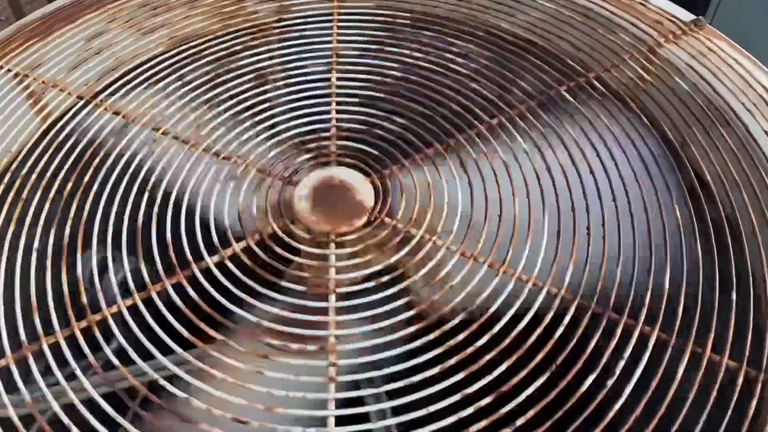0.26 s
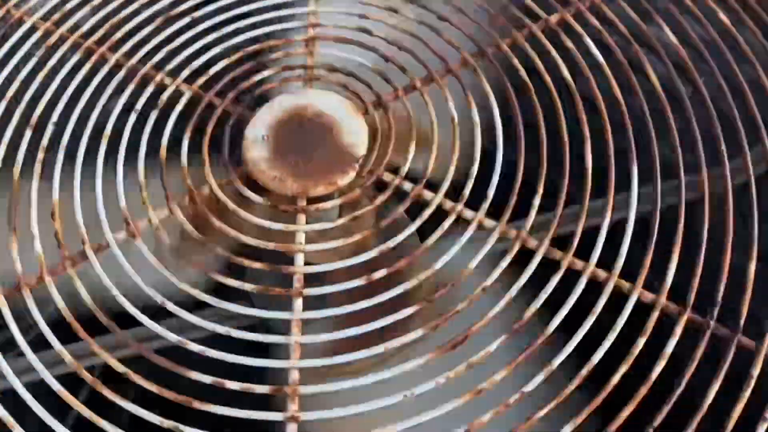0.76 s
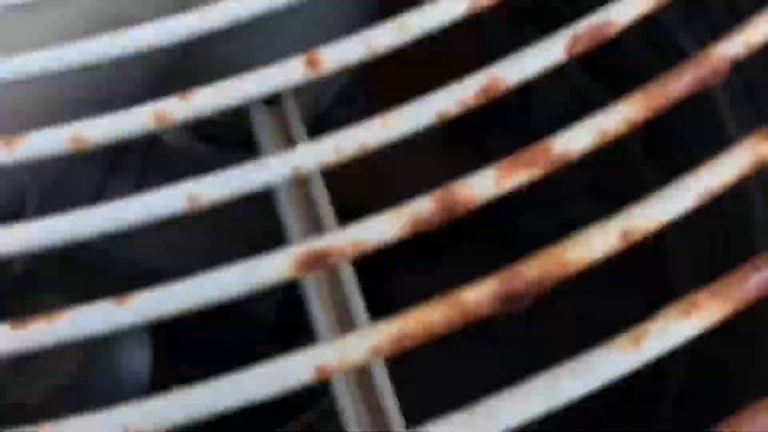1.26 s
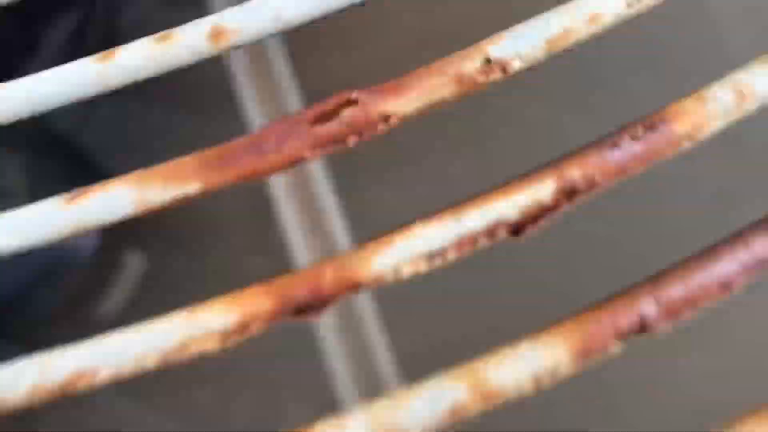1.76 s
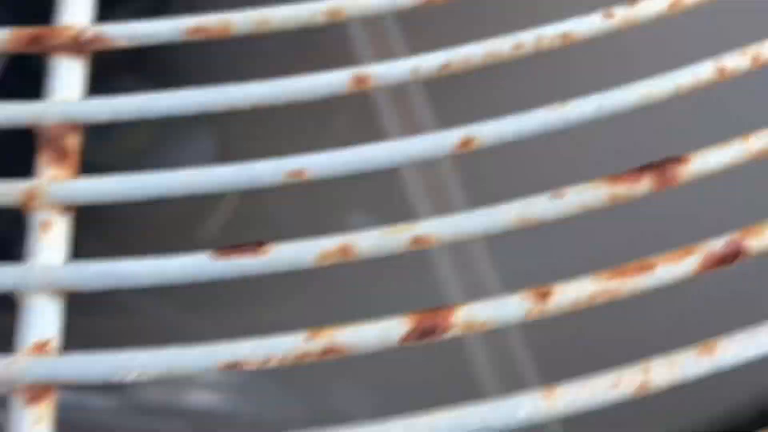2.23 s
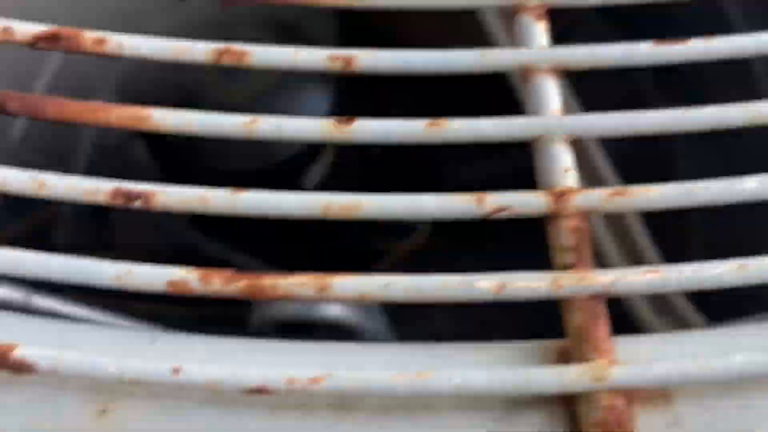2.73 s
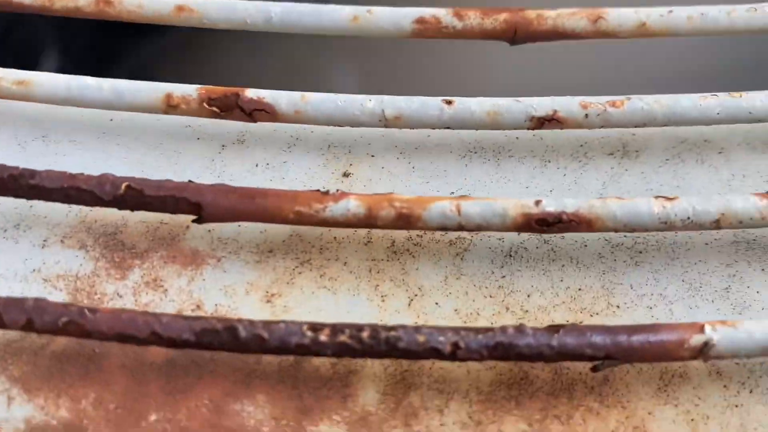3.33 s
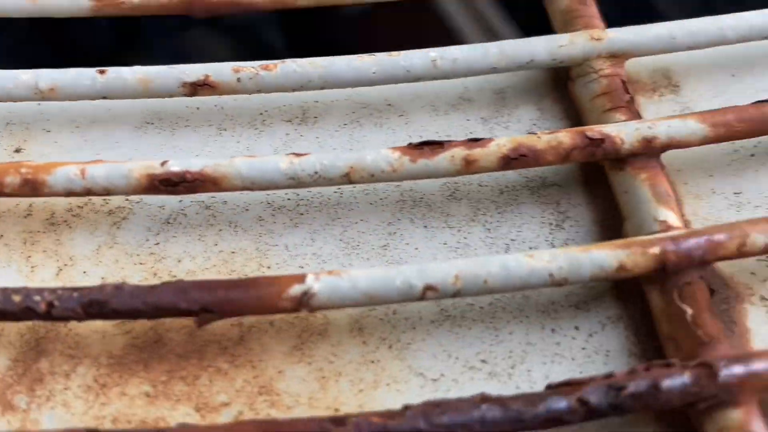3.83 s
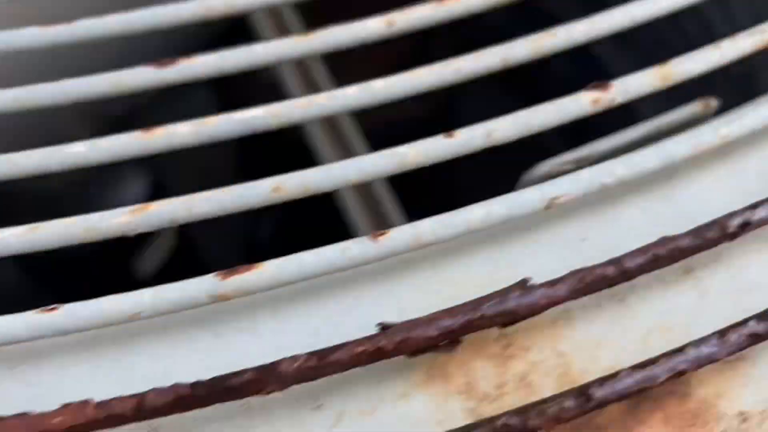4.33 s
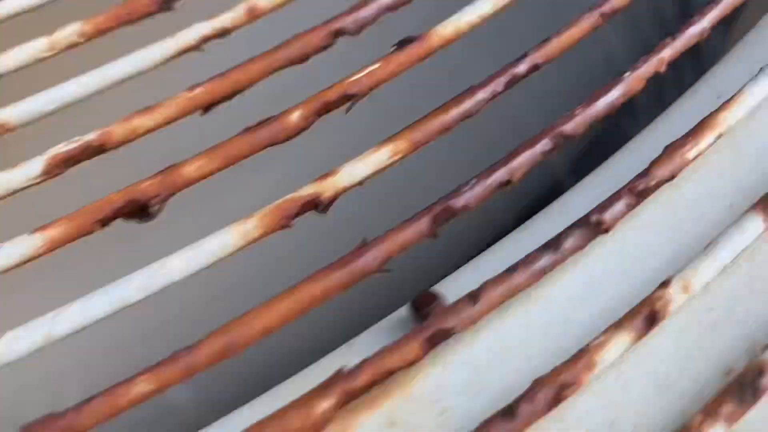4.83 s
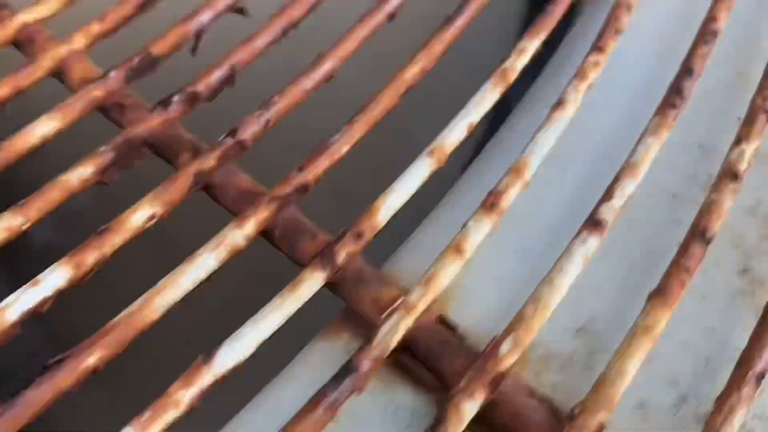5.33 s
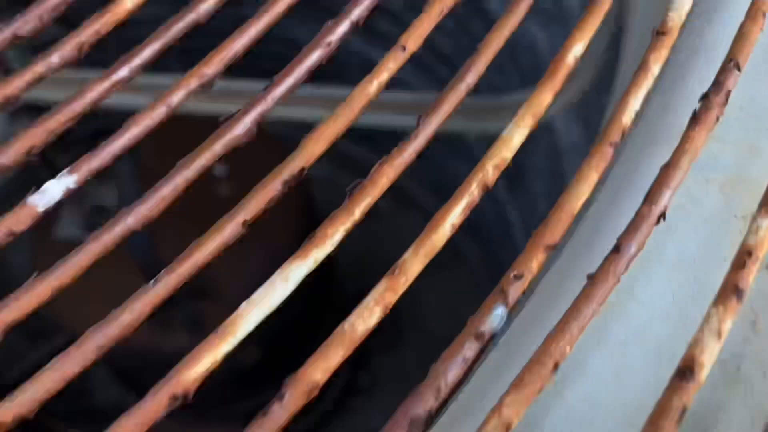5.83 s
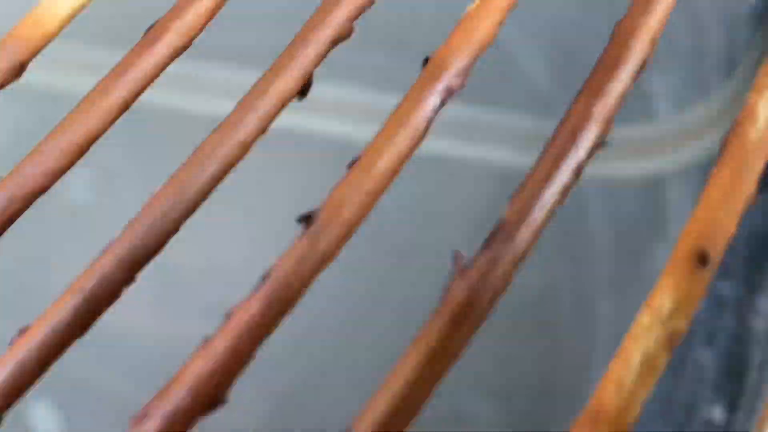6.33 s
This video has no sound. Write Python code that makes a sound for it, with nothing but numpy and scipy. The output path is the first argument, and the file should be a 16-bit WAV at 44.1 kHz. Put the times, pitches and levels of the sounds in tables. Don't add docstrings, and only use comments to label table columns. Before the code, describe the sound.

Handheld microphone dips into a big cooling fan's airstream; steady whir turns into heavy throbbing low-end flutter with wind buffeting, over compressor hum and buzz.

```python
import sys
import numpy as np
from scipy import signal
from scipy.fft import rfft, irfft, next_fast_len
from scipy.io import wavfile
from scipy.ndimage import uniform_filter1d, map_coordinates

SR = 44100
rng = np.random.default_rng(int(sys.argv[2]) if len(sys.argv) > 2 else 0)


def invert_db(x):
    u = np.asarray(x, float) / 20
    return 10 ** u


def unload_wav(signal):
    wavfile.write(
        sys.argv[1],
        SR,
        np.round(np.clip(np.atleast_2d(signal).T, -1, 1) * 32767).astype(np.int16),
    )


N = 290619
HOP = 16
BLADE_HZ, COMPRESSOR_HZ = 41.12, 56.805
LEFT_RIGHT = np.array([[0.5], [-0.5]])


def curves(table, size=1):
    s, *columns = np.transpose(table)
    return [np.interp(np.arange(0, N, size) / SR, s, column) for column in columns]


def on_log(hz, table):
    table_hz, *columns = np.transpose(table)
    return [np.interp(np.log(hz), np.log(table_hz), column) for column in columns]


def walk(rate, size=1):
    knots = rng.standard_normal(400)
    place = np.arange(0, N, size) * min(rate, 55.0) / SR
    step = place.astype(int)
    ease = 0.5 - 0.5 * np.cos(np.pi * (place - step))
    return 1.15 * (knots[step] * (1 - ease) + knots[step + 1] * ease)


def spread(v):
    slope = np.diff(v, append=v[..., -1:])[..., None]
    step = slope * np.arange(HOP, dtype=v.dtype) / HOP
    return (v[..., None] + step).reshape(*v.shape[:-1], -1)[..., :N]


def shade():
    t = np.arange(N) / SR
    from_s, to_s, ease_s, loss_db = 3.03, 4.15, 0.17, -29
    return loss_db * (np.tanh((t - from_s) / ease_s) - np.tanh((t - to_s) / ease_s)) / 2


# start_s, drone_db, facing [-1 valve side to 1 motor side]
COMPRESSOR_PATH = [(0, -28, 0.015), (.4, -24, -.5), (1.1, -22, .7), (1.5, -28.5, 0.05), (1.9, -32, -0.15),
                   (2.4, -30.5, 0.9), (2.85, -30.5, 0.23), (3.7, -37.5, 0.16), (4.1, -27, -0.59),
                   (4.9, -32.5, -0.59), (5.4, -29, -.8), (5.9, -35, -0.56), (6.59, -31, .5)]
# pitch_hz, width_hz, knock_db, gas_hiss_db
SHELL_MODES = [
    [(3730, 640, 7.5, 6.5), (4750, 290, 0, -32), (8000, 450, -17, -21)],
    [(5150, 410, 4.5, -2), (4600, 400, -7, -7), (5570, 200, -11, -32), (10800, 1700, -6, -39)],
]
# level_db, facing_db [per unit of facing], shade_share [0-1]
RING_LEVELS = [
    (-43, 4.5, 0.05),
    (-49.5, -3, 0.66),
]


def compressor():
    drone_db, facing = curves(COMPRESSOR_PATH)
    t = np.arange(N) / SR
    phase = 2 * np.pi * 5 * COMPRESSOR_HZ * t + 0.15 * walk(3)
    drone = np.sqrt(2) * invert_db(drone_db + 0.8 * walk(6)) * np.sin(phase)
    out = drone * np.ones((2, 1))

    size = next_fast_len(N + 64)
    hz = np.arange(size // 2 + 1) * SR / size
    orders = np.round(COMPRESSOR_HZ * np.arange(40, 230) * size / SR).astype(int)
    place = np.arange(N) + 30 + 2.15 * walk(4)
    for modes, (level_db, facing_db, shade_share) in zip(SHELL_MODES, RING_LEVELS):
        knock = np.zeros((2, len(hz)), complex)
        uneven = invert_db(3.4 * rng.standard_normal(len(orders)))
        shared_phase = 0.9 * rng.standard_normal(len(orders))
        port_phase = 0.6 * rng.standard_normal((2, len(orders)))
        knock[:, orders] = uneven * np.exp(1j * (shared_phase + port_phase))
        hiss = rng.standard_normal(size) + 0.88 * rng.standard_normal((2, size))
        gas = rfft(hiss) * np.sqrt(SR / COMPRESSOR_HZ) / size
        sound = 0
        for mode_hz, width_hz, knock_db, gas_db in modes:
            shape = 1 / (1 + (2 * (hz - mode_hz) / width_hz) ** 2)
            sound = sound + shape * (invert_db(knock_db) * knock + invert_db(gas_db) * gas)
        steady = irfft(sound, size).astype(np.float32)
        ring = np.array([map_coordinates(port, [place], order=3) for port in steady])
        ring_db = level_db + facing_db * facing + shade_share * shade()
        out = out + ring / ring.std() * invert_db(ring_db + walk(3.27))
    return out


def cowl(turn, depth, view_db):
    ring_hz, width_hz, level_db, view_share = 2346, 630, -38.5, 0.14
    size = next_fast_len(N)
    hz = np.arange(size // 2 + 1) * SR / size
    noise = rng.standard_normal(size) + 0.63 * rng.standard_normal((2, size))
    ring = irfft(rfft(noise) / (1 + (2 * (hz - ring_hz) / width_hz) ** 4), size)[:, :N]
    ring = ring * np.exp(0.9 * depth * np.cos(turn + 1.6)) * invert_db(1.5 * walk(30))
    return ring / ring.std() * invert_db(level_db + view_share * view_db + shade() + 1.8 * LEFT_RIGHT)


RUSH_CENTRES = [60, 250, 700, 1750, 6900]
# pitch_hz, level_db [per Hz]
AIR_COLOUR = [(22, -47), (32, -49), (50, -32), (65, -31), (105, -33), (160, -39.5), (300, -44.6),
              (600, -49.5), (1000, -52.5), (1600, -59.5), (2500, -65.7), (4200, -72.5), (7000, -76.5),
              (16000, -81)]
# pitch_hz, port_likeness [0-1], depth_share, scatter_db, left_minus_right_db
PUFF_REGIONS = [(40, 0.93, 0.51, 0.5, -2), (99, 0.79, 0.13, 0.5, -0.5), (246, 0.69, 0.66, 2, 1.3),
                (600, 0.65, 0.44, 2, 4), (1800, 0.29, 0.77, 1, 3), (3060, 0.59, 0.53, 1.1, 6.5),
                (5400, 0.5, 0.21, .5, 4.5), (9100, 0.19, 0.059, 0.66, 0)]


def air(turn, depth, near, swell_db):
    size = next_fast_len(N)
    hz = np.maximum(np.arange(size // 2 + 1) * SR / size, 1)
    common, left, right = (rfft(rng.standard_normal(size)) for _ in range(3))
    alike = np.clip(on_log(hz, PUFF_REGIONS)[0], 0, 1)
    pair = np.sqrt(alike) * common + np.sqrt(1 - alike) * np.array([left, right])
    pair = (pair * invert_db(on_log(hz, AIR_COLOUR)[0]) * np.sqrt(SR / 2)).astype(np.complex64)
    octave = np.log2(hz).astype(np.float32)
    swell_db = swell_db - 10 * np.log10(np.mean(invert_db(2 * swell_db), axis=1, keepdims=True))
    out, puff, gust = 0, walk(36, size=HOP), walk(7, size=HOP)
    for step in range(30):
        centre = 20 * 2 ** (step / 3)
        window = np.clip(1 - 3 * abs(octave - np.float32(np.log2(centre))), 0, 1)
        band = irfft(pair * window, size)[:, :N]
        if centre < 1100:
            band = band + 0.48 * (1 - near) * (band[::-1] - band) / 2
        weights = [np.interp(np.log(centre), np.log(RUSH_CENTRES), row) for row in np.eye(5)]
        _, share, scatter_db, pan_db = on_log(centre, PUFF_REGIONS)
        puff = 0.45 * puff + 0.89 * walk(41, size=HOP)
        sharp = 1.48 * share * depth[::HOP]
        late = 2 * np.pi * BLADE_HZ * 1.2 / max(centre, 150.0)
        edge = turn[::HOP] + 1.6 - late + np.array([[0.0], [0.3]])
        peak = np.cos(edge) + 0.24 * np.cos(2 * edge - 0.5)
        gate = np.exp(0.5 * sharp * peak) / (1 + sharp ** 2 / 8)
        puff_db = scatter_db * (0.27 + 0.78 * near[::HOP]) * (puff + 0.33 * gust)
        db = weights @ swell_db + puff_db + 0.65 * max(pan_db, 0.0) * LEFT_RIGHT
        out = out + band * spread((gate * invert_db(db)).astype(np.float32))
    return out


# start_s, peak_db, pitch_hz [at the start], left_minus_right_db
EDDY_POPS = [(.005, -11, 298, -5), (1.22, -11, 403, 13), (1.256, -12, 297, 7), (1.86, -18, 700, 10),
             (2.421, -15.5, 315, 2), (2.942, -12, 407, 5), (2.972, -10, 305, 5), (3.042, -12, 454, 8),
             (3.139, -8, 600, 8.5), (3.188, -19, 442, 4), (3.265, -12, 487, 2), (3.411, -8, 496, 7),
             (3.55, -10, 410, 8), (4.113, -9, 298, 3), (5.196, -15.5, 303, 3), (6.038, -11.5, 475, 6),
             (6.349, -13, 500, 15), (6.422, -6, 347, 5), (6.473, -13.5, 810, 9), (6.549, -13, 346, 17)]
# start_s, peak_db, pitch_hz [at the start], left_minus_right_db
EDDY_SLAPS = [
    (.118, -16, 450, 3),
    (.348, -13, 750, 3),
    (.383, -13, 650, 3),
    (2.192, -14, 900, 3),
    (2.258, -16, 800, 3),
    (3.225, -16, 400, 3),
    (3.565, -15, 600, 3),
]


def pops(table, right):
    length = 2048
    out, t = np.zeros((2, N + length)), np.arange(length) / SR
    for (s, db, hz, pan_db), chance in zip(table, rng.standard_normal((len(table), length))):
        cycles = hz * (0.262 * t + 0.75 * 0.009 * (1 - np.exp(-t / 0.0084)))
        envelope = 2 * (1 - np.exp(-t / 0.00086)) * np.exp(-t / 0.0074)
        ragged = 1 + 3.6 * uniform_filter1d(uniform_filter1d(chance, size=30), size=30)
        swing = np.sin(2 * np.pi * (cycles + chance[0])) * envelope * ragged
        start = int(s * SR)
        gains = np.array([[invert_db(db + pan_db / 2)], [right * invert_db(db - pan_db / 2)]])
        out[:, start:start + length] += gains * swing
    return out[:, :N]


# order, lead_rad, left_minus_right_db
BLADE_ORDERS = [
    (1, 0., 1.8),
    (2, 2.7, 3.),
    (3, 1.2, 3.),
]


def thump(turn, orders_db, lag):
    out = 0
    skews = (0.5 + 0 * lag, lag, 0.75 * lag)
    for (order, lead, pan_db), db, skew in zip(BLADE_ORDERS, orders_db, skews):
        phase = order * (turn + 0.093 * walk(12)) + lead + LEFT_RIGHT * skew
        level_db = db + 0.92 * walk(9.3) + LEFT_RIGHT * (pan_db + 2.3 * skew)
        out = out + np.sqrt(2) * invert_db(level_db) * np.cos(phase)
    return out


# start_s, angle [blade pitches round the hub], stream_depth [0-1],
# tip_view_db, port_turn_rad
HAND_PATH = [(0, .29, 0, -4.5, 0.44), (.3, 0.089, 0, -2.5, .4), (.75, 0.036, 0.37, 1, .4),
             (1.05, 0.095, 0.75, 2.5, 2.4), (1.38, .08, 1.1, 0, 2.4), (1.7, 0.016, 1, 0, 2.5),
             (2, 0.033, 1, -4.5, 2.4), (2.3, -0.027, 0.97, -5.5, 0.96), (2.65, -0.19, 0.95, -10, .45),
             (3, -0.22, 0.87, -11.5, .6), (3.45, -0.173, 0.98, -11, 0.42), (3.95, -0.27, .9, -13, 0.34),
             (4.4, -0.133, 0.87, -11.5, .3), (4.95, -0.012, 0.94, -10.5, .7), (5.35, 0.18, .95, -11.5, .6),
             (5.8, 0.23, 0.98, -9.5, 1.1), (6.2, 0.28, 1.07, -4.5, 1.1), (6.59, .31, 1.08, -4, 0.77)]
# clear_db [out of the stream], stream_gain_db, puff_gain_db [per unit of puff depth]
ORDER_LEVELS = [
    (-41, 24, 1.5),
    (-41.7, 21, 6.5),
    (-44, 7, 13),
]
VIEW_SHARES = [0.14, 0.5, 0.99, 0.61]


def scene():
    angle, stream, view_db, lag = curves(HAND_PATH)
    t = np.arange(N) / SR
    turn = 2 * np.pi * (BLADE_HZ * t + angle)
    near = np.clip(2 * stream - 1, 0, 1)
    depth = 0.34 + near * np.maximum(1.05 + 0.078 * view_db, 0)
    orders_db = [clear_db + gain_db * stream + puff_db * depth for clear_db, gain_db, puff_db in ORDER_LEVELS]
    gust_db = 13 * np.exp(-t / 0.065)
    buffet_db = 6 * stream - 0.34 * view_db + gust_db + 0.5 * walk(2.99)
    swell_db = np.array([buffet_db] + [share * view_db for share in VIEW_SHARES])[:, ::HOP]
    wake = turn + 0.3 * lag - 0.15
    out = compressor() + cowl(wake, depth, view_db)
    out = out + air(wake, depth, near.astype(np.float32), swell_db)
    out = out + invert_db(0.5) * pops(EDDY_POPS, 1) + pops(EDDY_SLAPS, -0.94)
    return out + thump(turn, orders_db, lag)


def roll_off(x):
    return signal.sosfilt(signal.butter(12, 16900, fs=SR, output="sos"), x)


# pitch_hz,
# then level_db
SUM_PITCH = [8000, 8300, 8800, 8950, 9550, 9650, 10800, 12400, 12500, 13750, 13800, 14400, 15800, 15850]
SUM_LEVEL = [0.5, -1.5, -12.5, -65, -56, -2.5, 1.5, -2, -60, -60, -10, -5.5, -5, -70]
# pitch_hz, then level_db
DIFFERENCE_PITCH = [3700, 4200, 5200, 6200, 6400, 7500, 7600, 8500, 10300, 10420, 11650, 11720, 14450,
                    14550]
DIFFERENCE_LEVEL = [1, -2.5, 3, -2, -10, -9, 0, 6, -0.5, -40, -60, -0.5, -2, -70]


def record(dry):
    ceiling, size = 0.86, next_fast_len(N)
    left, right = rfft(ceiling * np.tanh(1.023 * dry / ceiling), size)
    hz = np.arange(len(left)) * SR / size
    mid = (left + right) / 2 * invert_db(np.interp(hz, SUM_PITCH, SUM_LEVEL))
    side = (left - right) / 2 * invert_db(np.interp(hz, DIFFERENCE_PITCH, DIFFERENCE_LEVEL))
    mix = irfft(np.array([mid + side, mid - side]), size)[:, :N]
    return roll_off(mix)


dry = scene()
out = record(dry)
unload_wav(out)
```